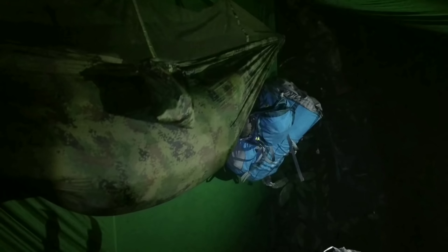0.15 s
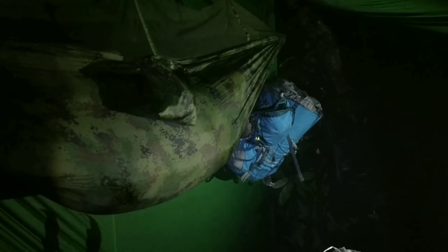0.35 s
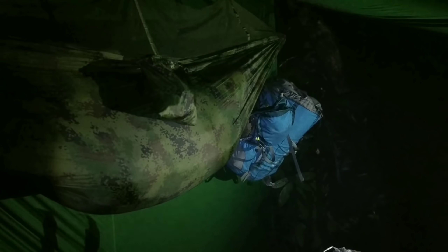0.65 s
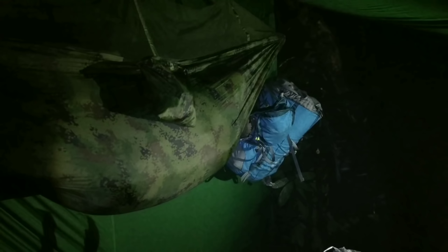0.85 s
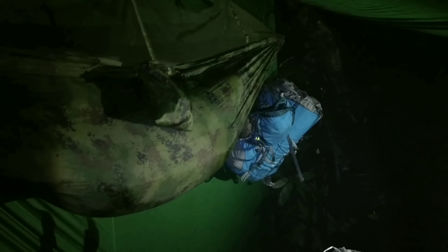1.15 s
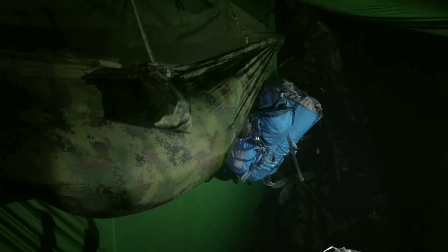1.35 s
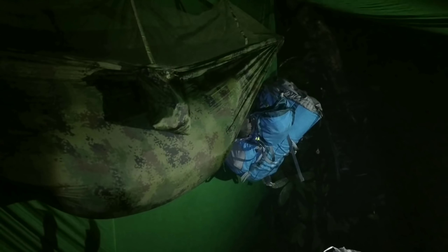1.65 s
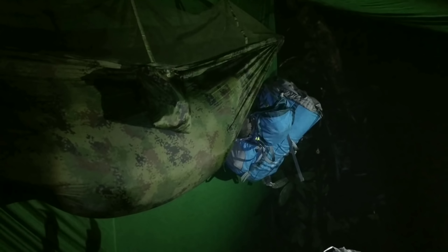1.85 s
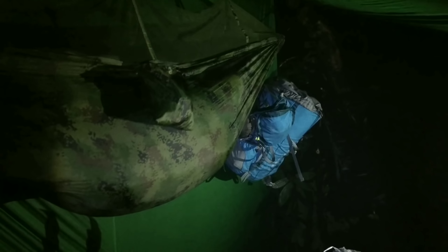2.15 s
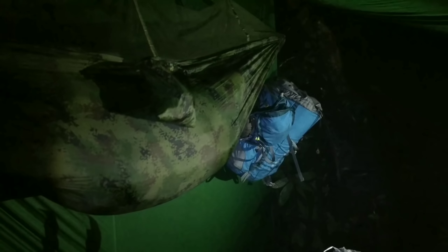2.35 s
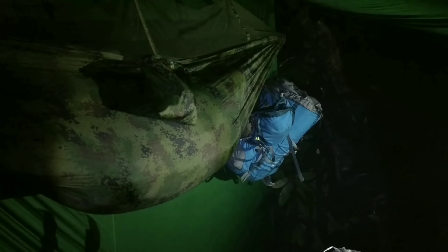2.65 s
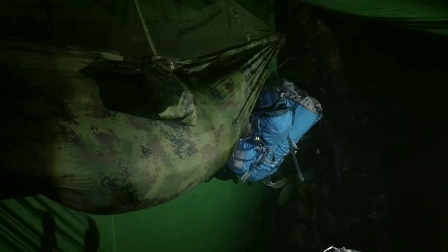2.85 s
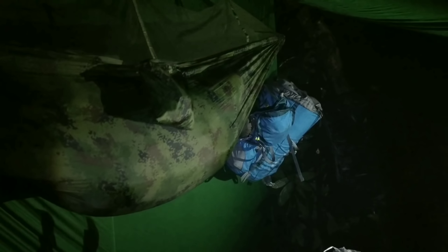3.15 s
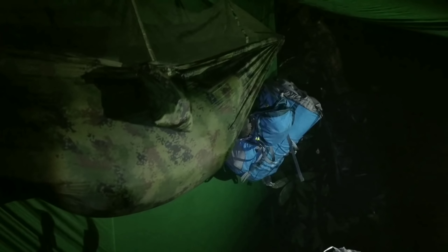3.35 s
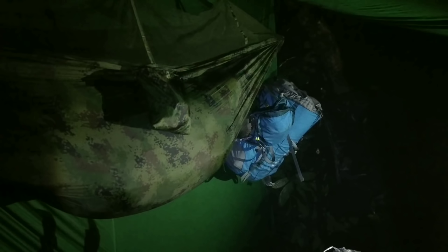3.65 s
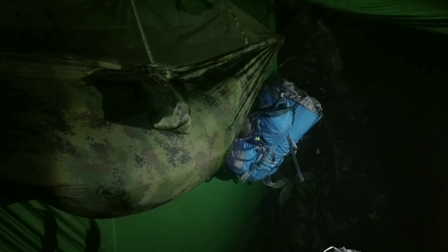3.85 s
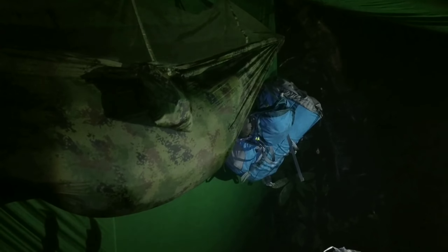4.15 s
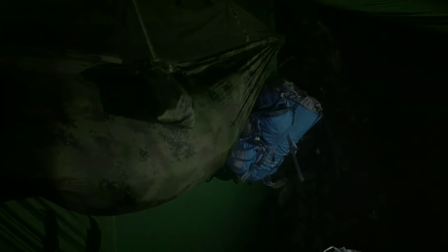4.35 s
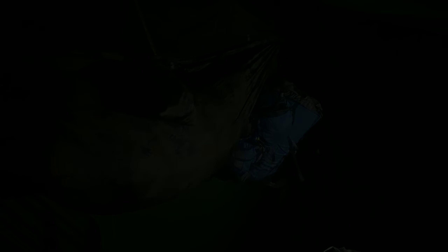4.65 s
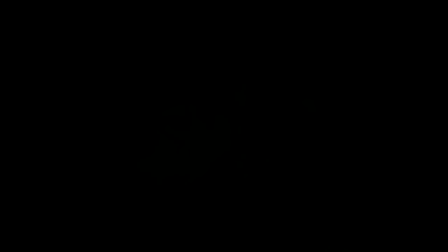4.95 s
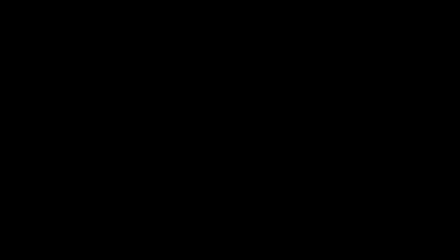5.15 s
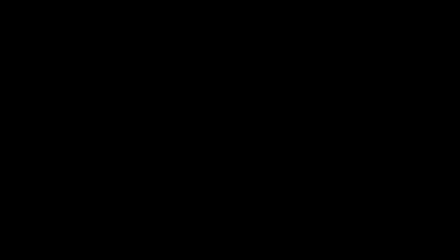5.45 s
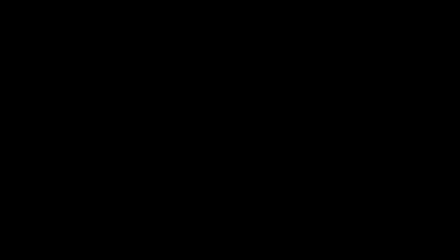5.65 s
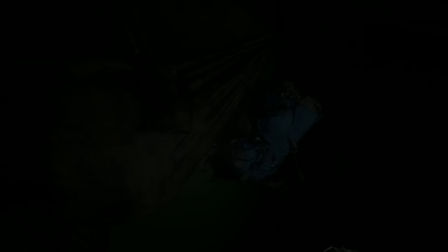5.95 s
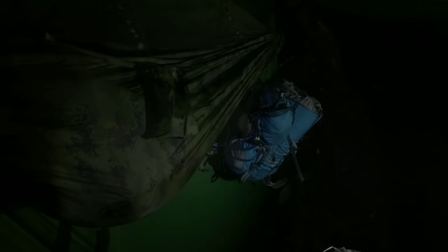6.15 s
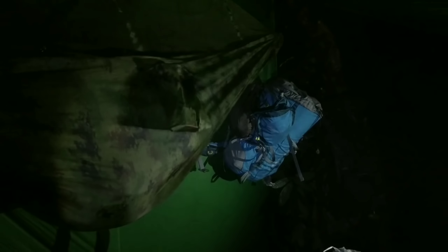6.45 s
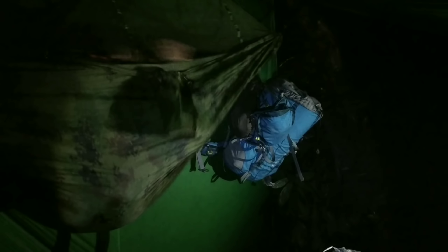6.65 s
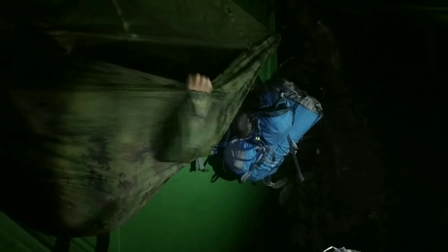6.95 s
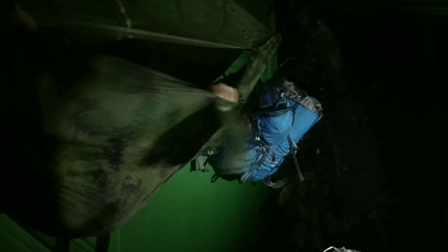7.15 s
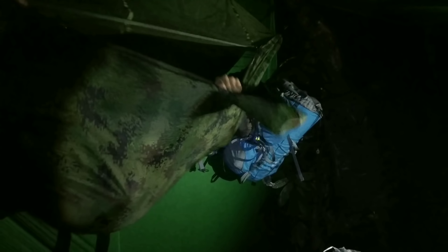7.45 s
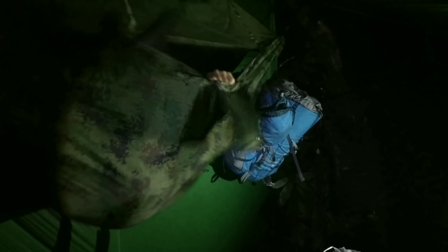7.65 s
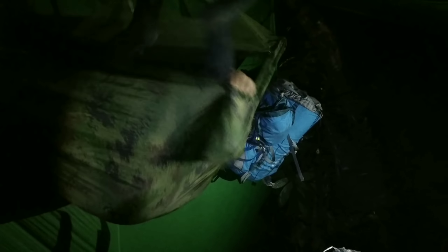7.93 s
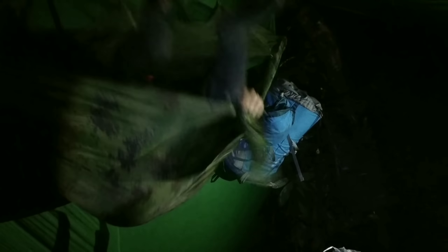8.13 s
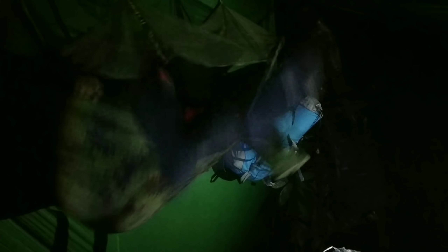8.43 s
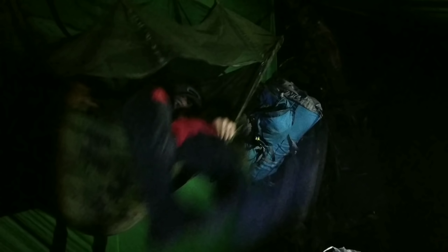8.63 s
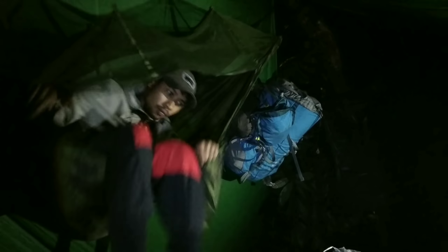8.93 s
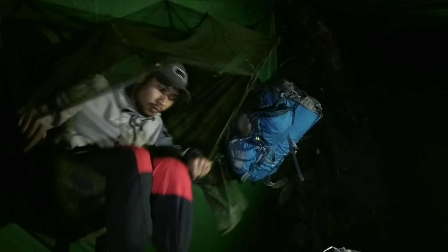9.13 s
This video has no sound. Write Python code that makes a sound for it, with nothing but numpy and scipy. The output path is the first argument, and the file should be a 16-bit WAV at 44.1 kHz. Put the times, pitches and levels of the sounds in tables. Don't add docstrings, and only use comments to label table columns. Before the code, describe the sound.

A stereo microphone at a forest camp hears dense, centred katydids and pulsing crickets, with soft air and distant rumble spread wide. Clean three-stroke chirps and irregular tarp drips stand out. The space narrows briefly near five seconds, then opens with close hammock movement: bright nylon rustle, low fabric drag, short cord groans, thin high stick-slip squeaks, bumps and dry snaps, while the insects continue.

```python
import sys
import numpy as np
from scipy import signal
from scipy.fft import rfft, irfft, next_fast_len
from scipy.io import wavfile

SR = 44100
rng = np.random.default_rng(int(sys.argv[2]) if len(sys.argv) > 2 else 0)


def wav_out(sig):
    wavfile.write(sys.argv[1], SR, np.round(np.clip(np.atleast_2d(sig).T, -1, 1) * 32767).astype(np.int16))


def boost_factor(decibels):
    exponent = np.asarray(decibels, float) / 20
    return 10 ** exponent


N = 409684

# double_strokes_per_s, level_db
KATYDIDS = [(101, 3), (108.5, -3), (97.5, -6), (160.5, -8)]
# freq_hz, density_db_per_hz
KATYDID_WING = [(4590, -21), (7800, -26.5), (8540, -12), (9150, -2.5), (9640, 0.5), (10300, -3.5),
                (10600, -20.5), (11000, -23.5), (14300, -52), (22000, -120)]
# start_hz, end_hz, stroke_s, strokes_per_s, level_db
CROWDS = [
    (6630, 6330, 0.0145, 38.5, -65),
    (6440, 6130, 0.015, 46, -66),
    (4883, 4300, 0.01215, 84, -65),
]
# start_hz, end_hz, stroke_s, strokes_per_s, level_db
LOW_CRICKETS = [(3233, 3150, 0.033, 25, -73), (3208, 2720, 0.01794, 21, -70.5)]
# freq_hz, density_db_per_hz
BED_HISS = [(18, -50), (40, -33), (100, -17.5), (230, 0.5), (450, -8), (1400, -8.5), (4100, -11.5),
            (5000, -0.5), (5500, -1.5), (5750, -16), (6200, -5.5), (7200, -10.5), (9600, -14.5),
            (11300, -17), (15400, -17.5)]
# freq_hz, density_db_per_hz
WIDE_HISS = [(150, -10), (500, -8.5), (2000, -7), (8000, -8), (15400, -13)]
# freq_hz, density_db_per_hz
RUMBLE = [(18, -55), (30, -29), (63, -4.5), (86, 5.5), (151, -6.5), (209, -7.5), (246, -16.5), (400, -40),
          (520, -62), (880, -120)]
# time_s, level_db
RUMBLE_LEVEL = [(0, -68.5), (.67, -73.5), (1, -73.5), (1.9, -73.5), (2.66, -75.5), (4.2, -75.5),
                (4.85, -90.5), (4.99, -100), (5.85, -108), (6.47, -92), (7.19, -70), (7.4, -71), (9, -78),
                (9.29, -74)]
# time_s, gain_db
BED_GAIN = [(0, 0), (4.9, 0.5), (5.1, 0.5), (5.14, 3), (5.86, 3.5), (5.9, 0.3), (6.3, 0.95), (9.29, -0.3)]
# time_s, gain_db
WIDE_FADE = [(0, 1.5), (2.1, 1.5), (4.1, 1), (4.5, -4.5), (4.9, -14), (5.0, -60), (5.9, -60), (6.0, -46),
             (6.4, -2), (6.9, 3.5), (7.25, 11), (9.29, 9.5)]
# middle_stroke_s, peak_db, first_stroke_weaker_db
CHIRPS = [(-0.0082, -42.5, 0), (0.2233, -42.5, 1.5), (1.2396, -43, 4), (1.434, -44, 1.5),
          (1.667, -43.5, 0.5), (1.8987, -42, 0.5), (2.1306, -42.5, 0.5), (2.3633, -43.5, .3),
          (2.594, -44, -1.5), (2.8655, -43.5, 6), (3.098, -43.5, 2), (3.331, -45, 2), (3.5616, -43.5, 1),
          (3.7953, -43, 3.5), (5.474, -41, 8), (5.7068, -40, -2), (5.9383, -44, -2.5), (6.167, -43, 2),
          (6.3958, -42.5, 1), (6.623, -42, 2.5), (6.8155, -42.5, 1), (7.045, -44, 2), (7.2733, -43.5, 10),
          (7.5035, -45.5, 0), (7.7722, -44, 12), (8.0027, -43, 6), (8.1976, -47.5, 30)]
# time_s, crack_peak_db, thud_db, thud_hz
TARP_DRIPS = [(0.0877, -51, -66, 665), (0.1321, -51, -73, 700), (0.5582, -45, -61, 1740),
              (1.2291, -57, -79, 969), (1.568, -55, -69, 1010), (1.818, -71, -57.5, 1650),
              (2.0924, -65, -65, 622), (2.5476, -59, -73, 1670), (2.8654, -50, -69, 2280),
              (3.1203, -60, -65, 1170), (3.3278, -42, -57.5, 1130), (3.4885, -57, -71, 1700),
              (3.6217, -59, -63.5, 1090), (4.1954, -61, -71, 606), (4.2926, -55, -70, 1080),
              (4.7157, -59, -69, 1080), (4.876, -62, -64, 2300), (4.9886, -46, -58, 1570),
              (5.678, -36, -45.5, 1340), (5.7274, -56, -63, 670), (5.822, -53, -69, 1382),
              (6.185, -58, -61.5, 1500), (6.387, -61, -80, 1070)]
# time_s, crack_peak_db, thud_db, thud_hz, left_minus_right_db
LEAF_DRIPS = [
    (1.037, -66, -74, 430, -23),
    (4.52, -52, -69, 600, 1),
    (8.2604, -48, -64, 789, 7),
]
# time_s, crack_peak_db, thud_db, thud_hz, left_minus_right_db
KNOCKS = [(1.0595, -49, -64, 1260, 15), (2.055, -56, -81, 900, -12), (2.9382, -39, -61, 1050, 5),
          (3.277, -51, -77, 900, -14), (3.905, -53, -79, 900, 16), (3.8634, -58, -74, 180, 6),
          (6.6383, -55, -72, 236, -1), (7.0994, -39, -53, 785, 7), (7.1594, -36, -63, 681, -5),
          (7.2514, -46, -58, 520, 0), (7.5315, -30, -48.5, 285, 2), (7.8844, -53, -61, 910, 6),
          (7.9609, -53, -53, 445, -5), (8.6844, -48, -59, 520, -2.5), (9.1403, -59, -58.5, 915, 8)]
# time_s, crack_peak_db, thud_db, thud_hz
SNAPS = [
    (8.4283, -45, -68, 2050),
    (8.459, -38.5, -59, 2340),
    (9.211, -33, -53.5, 1590),
    (9.2168, -45, -67, 560),
]
# after_start_s, start_hz, end_hz, length_s, peak_db
SYLLABLE = [
    (0, 11600, 11900, .0075, -53),
    (.0085, 12400, 12650, .011, -52),
    (0.017, 12400, 11500, .012, -54),
]
# time_s, start_hz, end_hz, length_s, peak_db
CALL_TAIL = (.33, 11750, 11550, .03, -66)
# start_s, chirps, gap_s
FAR_PHRASES = [(.3, 5, .21), (1.5, 6, .232), (2.93, 4, .233), (3.955, 7, .21), (5.56, 9, .224),
               (7.62, 8, .222)]
# time_s, start_hz, end_hz, length_s, peak_db
PEEPS = [
    (4.114, 1570, 1520, 0.0087, -60),
    (.7, 7420, 7480, .04, -64),
    (1.46, 7600, 7720, 0.032, -58),
    (1.49, 7480, 7330, 0.048, -63),
    (2.17, 7600, 7720, 0.03, -58),
    (2.92, 7600, 7720, 0.038, -57),
]
# time_s, start_hz, end_hz,
# length_s, peak_db
GROANS = [(4.57, 624, 600, .09, -70.5), (6.98, 407, 390, 0.019, -61), (7.025, 424, 478, 0.031, -60),
          (7.08, 335, 377, .07, -60.5), (7.11, 130, 120, 0.028, -64), (7.115, 1200, 1270, .03, -64),
          (7.14, 445, 696, .05, -57.5), (7.175, 692, 635, 0.052, -56), (7.19, 342, 325, 0.057, -60),
          (7.21, 612, 555, 0.062, -55), (7.255, 596, 614, .04, -67), (7.265, 500, 523, .04, -65),
          (7.16, 151, 110, .03, -55), (7.26, 100, 85, .05, -62), (7.26, 1225, 1170, 0.033, -62),
          (7.345, 171, 120, .12, -63), (7.33, 600, 610, .04, -67), (7.45, 149, 100, 0.078, -70),
          (7.535, 189, 120, 0.022, -49), (7.535, 1060, 1180, .02, -58), (7.9, 370, 560, 0.046, -69)]
# peak_s, rustle_db, drag_below_rustle_db, spread_s
SHIFTS = [(6.5, -67, 7.5, 0.17), (6.77, -58.5, 18, 0.13), (7.03, -55.5, 12.5, 0.11), (7.199, -56, 7, 0.19),
          (7.52, -53.5, 13.5, .12), (7.62, -55.5, 10, 0.19), (7.79, -60, 9, 0.094), (7.97, -60, 11, 0.1),
          (8.2, -57.5, 10, 0.35), (8.34, -55, 12, 0.13), (8.43, -62, 11, 0.057), (8.485, -51.5, 18.5, 0.12),
          (8.58, -67, 9, 0.088), (8.7, -54.5, 11, 0.037), (8.9, -62.5, 5.5, 0.7), (9.16, -65, 2, 0.041),
          (9.225, -54, 10, 0.029)]
# freq_hz, density_db_per_hz
NYLON = [(410, -45), (700, -24.5), (2550, -13), (3140, -11.5), (3760, -10.5), (6310, -14.5), (9920, -5.5),
         (10400, -4), (11400, -8.5), (15400, -12)]
# freq_hz, density_db_per_hz
DRAG = [(53, -42), (90, -1.5), (151, 0), (269, -0.5), (344, -11), (392, -8), (592, -0.5), (915, -7),
        (1500, -24.5), (1950, -34), (3300, -120)]
# start_s, hold_s, level_db, release_db_per_s
SQUEAKS = [(6.986, 0.13, -36.5, 900), (7.12, 0.055, -39, 400), (7.178, 0.13, -37, 300),
           (7.425, .006, -47, 700), (7.572, 0.078, -36, 348), (7.8, .004, -41, 598),
           (7.826, 0.012, -32, 348), (8.014, 0.0089, -41, 560), (8.428, .004, -29, 900),
           (8.457, .006, -30, 490), (8.722, .004, -45, 600), (8.852, .003, -36, 680),
           (9.01, .012, -37, 903), (9.08, .006, -45, 900)]


def rms_one(x):
    return x / np.sqrt(np.mean(x ** 2) + 1e-20)


def in_time(rows):
    time_s, value = np.transpose(rows)
    return np.interp(np.arange(N) / SR, time_s, value)


def colour(x, spectrum):
    hz, db = np.transpose(spectrum)
    size = next_fast_len(N)
    log_hz = np.log(np.arange(size // 2 + 1) * SR / size + 1)
    gain = boost_factor(np.interp(log_hz, np.log(hz), db, -99, -99))
    return rms_one(irfft(rfft(x, size) * gain, size)[..., :N])


def drift(rate_hz):
    knots = rng.standard_normal(int(N / SR * 60) + 2)
    return np.interp(np.arange(N) / SR * min(rate_hz, 59), np.arange(len(knots)), knots) * 1.2


def wide_noise(alike):
    mid, side = rng.standard_normal((2, N))
    return np.sqrt(1 + alike) * mid + np.sqrt(1 - alike) * side * [[1], [-1]]


def impulses(times_s, gains):
    at = (np.asarray(times_s) * SR).astype(int)
    marks = np.zeros(N)
    inside = (at >= 0) & (at < N)
    np.add.at(marks, at[inside], np.broadcast_to(gains, at.shape)[inside])
    return marks


def sweep(start_hz, end_hz, length_s):
    part = np.linspace(0, 1, int(length_s * SR))
    hz = start_hz + (end_hz - start_hz) * part ** 1.285
    envelope = np.sin(np.pi * part ** 0.83) ** 0.46
    return envelope * np.sin(2 * np.pi * np.cumsum(hz) / SR)


def trees(x, t60_s, wet_db, channels=1):
    t = np.arange(SR // 2) / SR
    tail = rng.standard_normal((channels, len(t))) * boost_factor(-60 * t / t60_s) * (t > .012)
    tail = tail / np.sqrt(np.sum(tail ** 2, axis=1, keepdims=True))
    return x + boost_factor(wet_db) * signal.fftconvolve(x[None], tail, axes=1)[:, :N]


def ramp_db(start_s, end_s, rise_db_per_s, fall_db_per_s):
    t = np.arange(N) / SR
    return -rise_db_per_s * np.maximum(start_s - t, 0) - fall_db_per_s * np.maximum(t - end_s, 0)


def beside(x, mid_db):
    mid, side = x.sum(axis=0) / 2, (x[0] - x[1]) / 2
    out_of_phase = np.roll(side - mid, 1) * np.array([[1], [-1]]) / np.sqrt(2)
    return boost_factor(mid_db) * mid + out_of_phase


def katydids():
    out = boost_factor(6.0) * rng.standard_normal(N)
    for cycles_per_s, level_db in KATYDIDS:
        phase = 2 * np.pi * np.cumsum(cycles_per_s * (1 + 0.00613 * drift(3))) / SR
        strokes = np.exp(.6 * np.cos(2 * phase) + .75 * np.cos(phase))
        gain = boost_factor(level_db + 0.49 * drift(0.93))
        out += gain * rms_one(strokes) * rng.standard_normal(N)
    return boost_factor(-50) * colour(out, KATYDID_WING)


def cricket_crowd(start_hz, end_hz, stroke_s, strokes_per_s, level_db, channels=1):
    out = 0
    for k in range(6):
        detune = 1 + 0.0053 * (k - 2.5)
        tempo = strokes_per_s * (1 + .02 * k * (-1) ** k)
        draws = rng.standard_normal((1000, 2))
        times_s = np.cumsum(1 + .12 * draws[:, 0]) / tempo - .1
        swell_db = 2.4 * np.interp(times_s * 6, np.arange(60), 1.2 * rng.standard_normal(60))
        marks = impulses(times_s, boost_factor(1.56 * draws[:, 1] + swell_db))
        out = out + signal.oaconvolve(marks, sweep(start_hz * detune, end_hz * detune, stroke_s))[:N]
    shimmer = boost_factor(1.3 * drift(40))
    blurred = trees(out, t60_s=.15, wet_db=4, channels=channels)
    return boost_factor(level_db) * rms_one(shimmer * blurred)


def forest_hiss():
    return boost_factor(-63) * colour(rng.standard_normal(N), BED_HISS)


def wide_air():
    return boost_factor(-70.5) * colour(wide_noise(0.46), WIDE_HISS)


def distant_rumble():
    gain = boost_factor(in_time(RUMBLE_LEVEL) + 2 + 3.3 * drift(3.3))
    return gain * colour(wide_noise(0.96), RUMBLE)


def near_cricket():
    middle_s, chirp_db, weaker_db = np.transpose(CHIRPS)
    shape = (len(middle_s), 3)
    times_s = middle_s[:, None] + .0352 * np.array([-1, 0, 1]) + .0006 * rng.standard_normal(shape)
    level_db = chirp_db[:, None] - weaker_db[:, None] * [1, 0, 0] + 1.2 * rng.standard_normal(shape)
    start_hz, end_hz, length_s = 5390, 4760, .0165
    stroke = sweep(start_hz, end_hz, length_s)
    stroke = stroke + boost_factor(-21.5) * sweep(3 * start_hz, 3 * end_hz, length_s)
    stroke = stroke * np.hanning(len(stroke)) ** 0.1
    marks = impulses(times_s.ravel() - .008, boost_factor(level_db.ravel() + 1.05))
    calls = signal.fftconvolve(marks, stroke)[:N]
    calls = calls + boost_factor(-13.5) * np.roll(calls, int(0.0204 * SR))
    return trees(calls, t60_s=.2, wet_db=-13)


def drips(rows, bright_db, ring_over_db):
    t = np.arange(SR // 20) / SR
    out = np.zeros((2, N + SR))
    bright = signal.butter(2, [6800, 13200], "band", fs=SR, output="sos")
    middle = signal.butter(2, [2900, 4300], "band", fs=SR, output="sos")
    noise = rng.standard_normal((len(rows), len(t)))
    for (time_s, crack_db, thud_db, hz, *pan_db), hiss in zip(rows, noise):
        ring_db = (crack_db + thud_db) / 2 + ring_over_db
        crack = signal.sosfilt(bright, hiss) * (boost_factor(-60 * t / 0.0061) + boost_factor(-3.0 - 60 * t / 0.059))
        ring = signal.sosfilt(middle, hiss * boost_factor(-60 * t / 0.018))
        thud = np.sin(2 * np.pi * hz * t) + boost_factor(-7.5) * np.sin(.9 * np.pi * hz * t)
        thud = thud * boost_factor(-60 * t * hz / 9) * (1 - np.exp(-t * hz * 3))
        overtone = boost_factor(-3) * np.cos(3.3 * np.pi * hz * t) * boost_factor(-60 * t * hz / 3.3)
        thud_highpass = signal.butter(2, hz / 5, "high", fs=SR, output="sos")
        thud = signal.sosfilt(thud_highpass, thud + overtone)
        hit = boost_factor(crack_db + bright_db) * crack
        hit = hit + boost_factor(ring_db + bright_db + 15.5) * ring + boost_factor(thud_db + 16) * thud
        at = int(time_s * SR)
        out[:, at:at + len(t)] += hit * boost_factor(np.array([[.5], [-.5]]) * sum(pan_db))
    return out[:, :N]


def peeps(rows):
    out = np.zeros(N)
    for time_s, start_hz, end_hz, length_s, peak_db in rows:
        pulse = sweep(start_hz, end_hz, length_s)
        at = int((time_s - length_s / 2) * SR)
        out[at:at + len(pulse)] += boost_factor(peak_db) * pulse
    return out


def high_insect():
    rows = [CALL_TAIL]
    for start_s, gain_db in ((.239, 0), (.285, -4)):
        for after_s, start_hz, end_hz, length_s, peak_db in SYLLABLE:
            rows.append((start_s + after_s, start_hz, end_hz, length_s, peak_db + gain_db))
    return trees(peeps(rows), t60_s=0.36, wet_db=5.0, channels=2)


def far_cricket():
    times_s = np.concatenate([start_s + gap_s * np.arange(chirps) for start_s, chirps, gap_s in FAR_PHRASES])
    marks = np.zeros(N)
    for k in range(3):
        jitter_s = .004 * rng.standard_normal(len(times_s))
        marks += impulses(times_s + k * .035 + jitter_s, boost_factor(-65.5))
    return trees(signal.fftconvolve(marks, sweep(5450, 4600, .018))[:N], t60_s=.1, wet_db=9)


def hammock():
    rustle_power, drag_power = 0, 0
    for peak_s, rustle_db, below_db, spread_s in SHIFTS:
        slope_db_per_s = 8.5 / spread_s
        power = boost_factor(2 * ramp_db(peak_s, peak_s, slope_db_per_s, slope_db_per_s) + 2 * rustle_db)
        rustle_power = rustle_power + power
        drag_power = drag_power + power * boost_factor(-2 * below_db)
    grain_db = 2.0 * np.minimum(rng.exponential(1, (2, N)), 5)
    grains = boost_factor(grain_db + 1.86 * np.array([drift(30), drift(30)]))
    nylon = colour(grains * wide_noise(-0.19), NYLON) * np.sqrt(rustle_power)
    nylon = nylon * boost_factor(12.0) * boost_factor(np.array([[-1.1], [1.1]]))
    drag = colour(boost_factor(1.07 * drift(23)) * wide_noise(0.88), DRAG) * np.sqrt(drag_power) * boost_factor(3.0)
    groans = trees(peeps(GROANS) * boost_factor(2.7 * drift(55)), t60_s=0.091, wet_db=-5.0, channels=2)
    return nylon + drag + groans


def rope():
    attack_db_per_s = 698
    levels_db = [level_db + ramp_db(start_s, start_s + hold_s, attack_db_per_s, release_db_per_s)
                 for start_s, hold_s, level_db, release_db_per_s in SQUEAKS]
    level_db = np.max(levels_db, axis=0)
    out = np.zeros(N)
    for hz, power_share in ((10520, .49), (10715, .51)):
        wobble_hz = hz * (1 + 0.004 * drift(40))
        gain = boost_factor(level_db - 5.0 + 4.8 * drift(55)) * np.sqrt(power_share)
        out += gain * np.sin(2 * np.pi * np.cumsum(wobble_hz) / SR)
    return beside(trees(out, t60_s=.05, wet_db=-4, channels=2), mid_db=-7)


def scene():
    bed = katydids() + sum(cricket_crowd(*row) for row in CROWDS) + forest_hiss()
    bed = bed + far_cricket() + peeps(PEEPS)
    wide = sum(cricket_crowd(*row, channels=2) for row in LOW_CRICKETS) + wide_air() + high_insect()
    mix = bed * boost_factor(in_time(BED_GAIN)) + wide * boost_factor(in_time(WIDE_FADE)) + distant_rumble()
    mix = mix + near_cricket() + drips(TARP_DRIPS, bright_db=1.0, ring_over_db=-5.5)
    mix = mix + drips(LEAF_DRIPS, bright_db=4.5, ring_over_db=2.5)
    mix = mix + drips(KNOCKS, bright_db=-7, ring_over_db=-3)
    snaps = beside(drips(SNAPS, bright_db=3.0, ring_over_db=-22), mid_db=-1)
    return mix + hammock() + rope() + snaps


def band_limit(x):
    return signal.sosfilt(signal.butter(12, 15560, fs=SR, output="sos"), x)


def record(dry):
    bass_cut = signal.butter(2, 45, "high", fs=SR, output="sos")
    top_cut = signal.ellip(10, .5, 60, 15480, fs=SR, output="sos")
    mix = signal.sosfilt(top_cut, signal.sosfilt(bass_cut, dry))
    return band_limit(mix)


dry = scene()
out = record(dry)
wav_out(out)
```